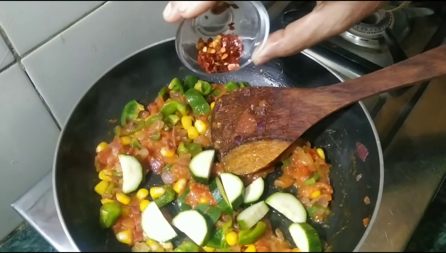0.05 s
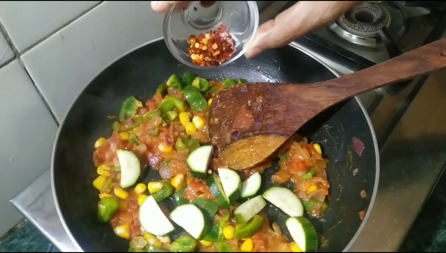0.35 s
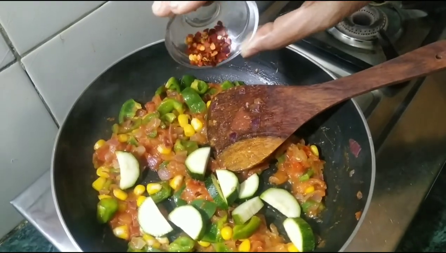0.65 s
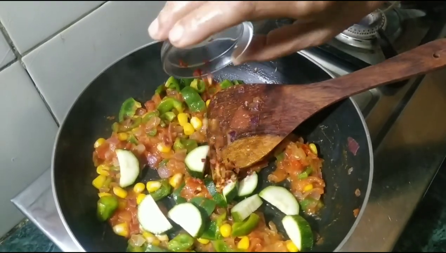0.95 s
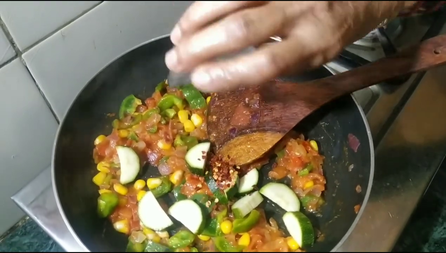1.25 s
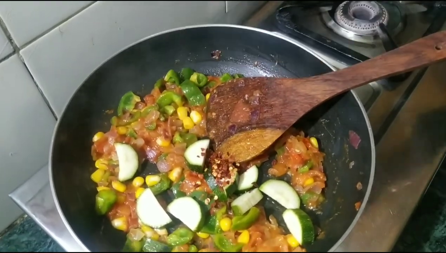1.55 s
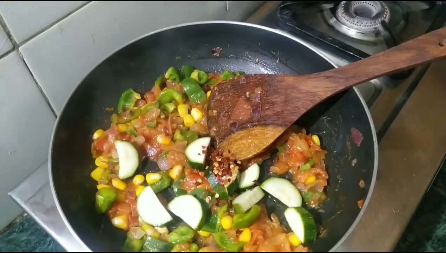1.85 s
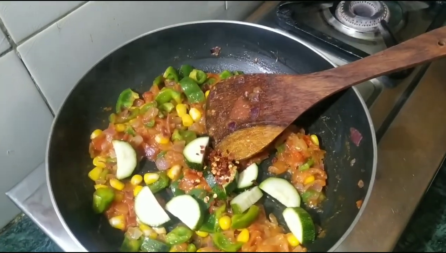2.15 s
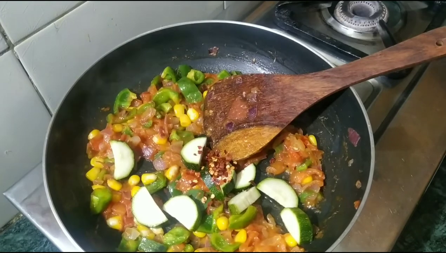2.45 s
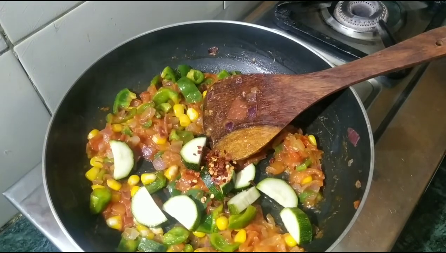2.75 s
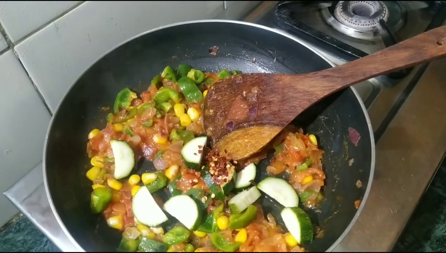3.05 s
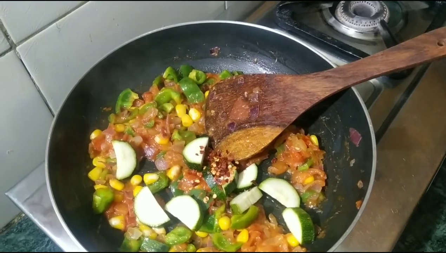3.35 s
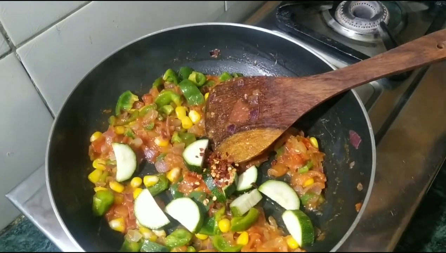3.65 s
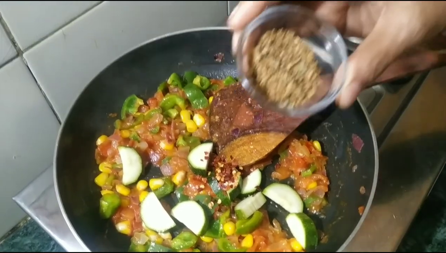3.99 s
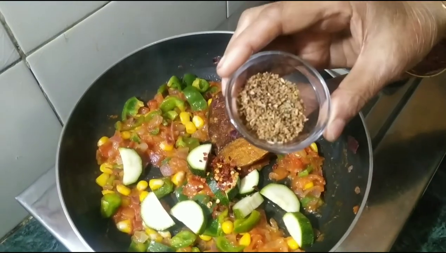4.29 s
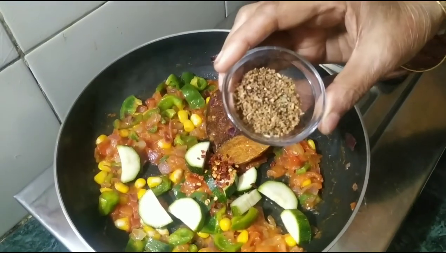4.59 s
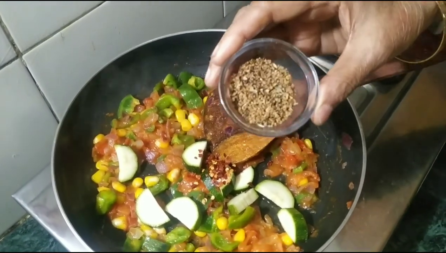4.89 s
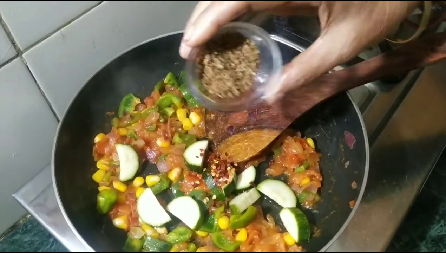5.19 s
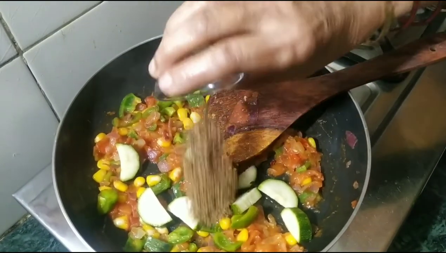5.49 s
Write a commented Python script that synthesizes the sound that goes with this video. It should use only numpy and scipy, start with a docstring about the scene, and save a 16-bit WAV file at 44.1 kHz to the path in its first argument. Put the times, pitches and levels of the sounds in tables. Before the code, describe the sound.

Vegetables sizzle faintly in oil throughout, over the soft flutter of a gas flame, a low motor hum and a thin electric whine. Light ticks of fingers and spices come at about 0.2 and 1.1 seconds. At 1.45 seconds a small glass bowl knocks sharply onto a stone counter, chattering for an instant. From about 1.75 to 2 seconds it rattles against a second bowl in five quick, bright clinks, with a high ring that a hand damps. These knocks and clinks are by far the loudest sounds. A larger dish rings on faintly, and the sizzle swells briefly around 2.2 seconds. Scattered light taps follow, the clearest at about 3.9, 4.3 and 4.8 seconds, with a tiny ping near 5.3 seconds. Everything sounds close, with the short reflections of a tiled kitchen.

```python
"""Glass spice bowls in a tiled kitchen.

Vegetables sizzle faintly as steam bubbles burst in oil, over a gas flame, motor hum and electric whine.
Fingers, spices and utensils tap lightly. A small glass bowl knocks down on a stone counter,
then rattles against a second bowl and rings until the hand damps it."""
import sys
import numpy as np
from scipy import signal
from scipy.fft import rfft, irfft
from scipy.io import wavfile
from scipy.ndimage import uniform_filter1d

SR = 44100
rng = np.random.default_rng(int(sys.argv[2]) if len(sys.argv) > 2 else 0)


def inscribe(sig):
    """Save sig as 16-bit PCM at rate SR to the path in sys.argv[1].

    A 1-D sig is mono; a 2-D sig holds one channel per row.
    Samples are clipped to [-1, 1] before scaling.
    """
    pcm = np.round(np.clip(np.atleast_2d(sig).T, -1, 1) * 32767)
    wavfile.write(sys.argv[1], SR, pcm.astype(np.int16))


N = 243873
TIME = np.arange(N) / SR


def amp(db):
    """Decibels to gain."""
    return 10 ** (np.asarray(db) / 20)


def unit(x):
    """Scale to rms 1."""
    return x / np.sqrt(np.mean(x ** 2) + 1e-20)


def read(points, hz):
    """Interpolate a table over log frequency."""
    f, value = np.transpose(points)
    return np.interp(np.log(hz + 1), np.log(f), value)


def add(mix, start_s, sound):
    """Mix a sound in at start_s."""
    part = mix[max(round(start_s * SR), 0):][:len(sound)]
    part += sound[:len(part)]


def tint(x, colour):
    """Filter by a spectrum table; rms 1."""
    return unit(irfft(rfft(x) * amp(read(colour, np.fft.rfftfreq(N, 1 / SR))), N))


def drift(rate_hz):
    """Slow random wander; rms 1."""
    lowpass = np.exp(-(np.fft.rfftfreq(N, 1 / SR) / rate_hz) ** 2)
    return unit(irfft(rfft(rng.standard_normal(N)) * lowpass, N))


def kitchen(x, build_s):
    """Dense reflections off tiles and steel build up, then die band by band."""
    # room decay: f/Hz, t60/s
    decay = [(150, .2), (800, .3), (2000, .245), (3300, .21), (5500, .18), (14000, .12)]
    echoes = rng.standard_normal(SR) * (rng.random(SR) < .2)
    hz, t, bands = signal.stft(echoes, SR, nperseg=256)
    bands = bands * amp(-60 * t / read(decay, hz)[:, None])
    tail = signal.istft(bands, SR, nperseg=256)[1][:SR]
    tail *= 1 - np.exp(-TIME[:SR] / build_s)
    return signal.fftconvolve(x, tail / np.linalg.norm(tail))[:N]


def sizzle(pops_per_s=2500, spread_db=4, flare_s=2.185, flare_db=6, flare_width_s=.055):
    """Tiny steam bubbles burst in the oil, a few larger; the oil flares up once."""
    # frying strength before the flare: t/s, rms level/dB
    strength = [(0, -55), (.45, -56.5), (.7, -61.5), (1.4, -60.5), (2.2, -59), (2.65, -62.5), (3.2, -58),
                (4.6, -57.5), (5.2, -60)]
    # frying spectrum: f/Hz, relative level/dB
    colour = [(500, -13), (1800, -8.5), (2900, 1), (4600, 4.5), (6000, 0), (8000, -10), (16000, -26)]
    pops = rng.choice([-1, 1], N) * (rng.random(N) < pops_per_s / SR)
    pops = pops * amp(spread_db * np.minimum(rng.exponential(1, N), 4))
    level_db = np.interp(TIME, *np.transpose(strength))
    level_db += flare_db * np.exp(-((TIME - flare_s) / flare_width_s) ** 2)
    return amp(level_db) * tint(pops + kitchen(pops, build_s=.0008), colour)


def flame(level_db=-54, flutter_db=1.7):
    """Soft, fluttering rush of gas flame and room air."""
    # noise spectrum: f/Hz, relative level/dB
    colour = [(30, -44), (80, -28), (125, -26.5), (165, -4.5), (210, -2.5), (300, -1.5), (440, -10),
              (600, -9.5), (900, -14.5), (1300, -11.5), (2500, -10.5), (5000, -14.5), (8400, -26),
              (10300, -17), (12300, -28.5), (15700, -18)]
    return amp(level_db + flutter_db * drift(3.7)) * tint(rng.standard_normal(N), colour)


def motor_hum():
    """A motor and the low resonances it stirs, each wavering in pitch."""
    # hum tones: f/Hz, rms level/dB, rms waver/Hz
    tones = [(100, -88, .5), (167, -74, 4), (197, -66, 2), (221, -69, 6), (281, -69, 6), (296, -66, 3),
             (396, -72, 3), (489, -68, 1.2), (537.5, -63, 1.3), (599, -73, .5)]
    out = np.zeros(N)
    for hz, db, waver_hz in tones:
        turns = np.cumsum(hz + waver_hz * drift(8.35)) / SR + rng.random()
        out += np.sqrt(2) * amp(db) * np.sin(2 * np.pi * turns)
    return out


def whine(base_hz=59.982, harmonic_step=10, buzz_db=-68, fall_db=-2.5):
    """Electric interference: strong harmonics in phase, a fine treble buzz between them."""
    # runs of evenly spaced strong lines: lowest harmonic, line count
    runs = [(20, 4), (81, 11), (162, 11)]
    # strong-line spectrum: f/Hz, rms level/dB
    colour = [(1200, -69.5), (4800, -72), (6100, -68), (7300, -70.5), (8450, -84.5), (9700, -76.5),
              (10900, -78), (12100, -83), (13500, -71.5), (15100, -74), (15700, -78)]
    out = np.zeros(N)
    strong = np.concatenate([lowest + harmonic_step * np.arange(count) for lowest, count in runs])
    for hz in base_hz * strong:
        out += np.sqrt(2) * amp(read(colour, hz)) * np.cos(2 * np.pi * hz * TIME)
    weak = np.setdiff1d(np.arange(148, 262), strong)
    weak_hz = base_hz * weak
    harmonics_away = abs(weak[:, None] - strong).min(axis=1)
    weak_db = read(colour, weak_hz) + fall_db * harmonics_away
    buzz = sum(amp(db) * np.cos(2 * np.pi * (hz * TIME + rng.random()))
               for hz, db in zip(weak_hz, weak_db))
    return out + amp(buzz_db) * unit(buzz)


def tap(peak_db, hz, width_hz, rise_s=.00037):
    """A small blow through one resonance: wide ones tick, narrow ones ping."""
    t = TIME[:SR // 4]
    envelope = np.exp(-np.pi * width_hz * t) * (1 - np.exp(-t / rise_s))
    sound = np.diff(envelope * np.sin(2 * np.pi * hz * t))  # small things radiate little bass
    return amp(peak_db) * sound / abs(sound).max()


def taps(room_db=-4):
    """Light taps of fingers, spices and utensils, and two thin pings."""
    # taps: t/s, level/dB, main resonance f/Hz, width/Hz
    blows = [(.198, -40, 4340, 800), (1.138, -38, 2600, 1800), (2.461, -42, 1290, 500),
             (3.32, -40, 1700, 900), (3.88, -33, 4230, 700), (4.328, -29, 2940, 222),
             (4.801, -33.5, 3600, 1200), (5.31, -50, 5010, 40)]
    # tap resonances: ratio to main f and width, relative level/dB
    tap_modes = [(.51, -14), (1, 0.5), (1.67, -12)]
    # pings: t/s, level/dB
    pings = [(.722, -52.5), (2.8955, -45)]
    # ping resonances: f/Hz, relative level/dB, width/Hz
    ping_modes = [(9400, -2, 50), (12500, -9, 60), (14600, 0, 600)]
    out = np.zeros(N)
    for s, db, hz, width_hz in blows:
        for ratio, mode_db in tap_modes:
            add(out, s, tap(db + mode_db, hz * ratio, width_hz * ratio))
    for s, db in pings:
        for hz, mode_db, width_hz in ping_modes:
            add(out, s, tap(db + mode_db, hz, width_hz))
    return out + amp(room_db) * kitchen(out, build_s=.001)


def knock(colour, ripple_db, smear, size=2048):
    """A click of peak 1 lingering in its resonances; each contact point stresses them differently."""
    hz = abs(np.fft.fftfreq(size, 1 / SR))
    ripple = np.interp(hz, np.linspace(0, SR / 2, num=80), rng.standard_normal(80))
    log_gain = np.log(amp(read(colour, hz) + ripple_db * ripple))
    phase = -(1 + smear) * signal.hilbert(log_gain).imag  # minimum phase, stretched
    impulse = np.fft.ifft(np.exp(log_gain + 1j * phase)).real
    click = np.roll(impulse, 8)[:size // 2]
    return click / abs(click).max()


def mode(hz, db, t60_s):
    """One second of a decaying sine."""
    t = TIME[:SR]
    return amp(db - 60 * t / t60_s) * np.sin(2 * np.pi * hz * t)


def landing(knock_db=2, ring_db=-30, room_db=-5):
    """The bowl chatters to rest on stone; the first knock sets bowl and counter ringing."""
    # contacts: t/s, level/dB re knock_db
    bounces = [(1.4508, -2.5), (1.4567, -5), (1.4613, -10), (1.4666, -10.5)]
    # glass-on-stone spectrum: f/Hz, relative level/dB
    colour = [(40, -40), (170, -35), (500, -21), (750, -13.5), (1400, -8), (2300, 7), (3000, 3), (3700, -1),
              (4300, -1.5), (4900, 5), (5700, -14.5), (7000, -32), (9000, -54), (16000, -37)]
    # joint modes of bowl and counter: f/Hz, level/dB re ring_db, t60/s
    modes = [(830, -17, .25), (1220, -11, .25), (1409, -4, .25), (1919, -7, .24), (2209, -5, .18),
             (2265, -6, .22), (2601, -5, .18), (2772, -6, .17), (2923, -4, .14), (3618, -7, .17),
             (4843, -1, .22), (11720, -9, .08), (14700, -11, .09)]
    knocks, ring = np.zeros((2, N))
    contact = amp(knock_db) * knock(colour, ripple_db=1.5, smear=.85)
    for s, db in bounces:
        add(knocks, s, amp(db) * contact)
    for hz, db, t60_s in modes:
        add(ring, bounces[0][0], rng.choice([-1, 1]) * mode(hz, db + ring_db, t60_s))
    return knocks + ring + amp(room_db) * kitchen(knocks, build_s=.0024)


def contacts(gap_stretch=1.58, rebound_db=-3, graze_lead_s=.0025, graze_db=-16, graze_ring_db=-14):
    """Each clash is a graze of the rims, a blow and two rebounds. Rows: t/s, knock/dB, ring/dB."""
    # bowl on bowl: t/s, knock level/dB, ring level/dB, first gap/s, ring change per rebound/dB
    clashes = [(1.7631, -4.5, -14, .0029, -4), (1.8223, -3.5, -14, .0055, 1.5),
               (1.8728, -3.5, -14.5, .0033, 1), (1.9137, -4.5, -9, 0.005, -4),
               (1.9376, -9.5, -13, .0138, -3.5)]
    k, rows = np.arange(3), []
    for s, knock_db, ring_db, gap_s, step_db in clashes:
        gaps_s = gap_s * gap_stretch ** k  # longer as the bowls part
        rows.append((s - graze_lead_s, knock_db + graze_db, ring_db + graze_ring_db))
        rows += zip(s + np.cumsum(gaps_s) - gaps_s, knock_db + rebound_db * k ** 2, ring_db + step_db * k)
    return rows


def rattle(bowl_hz=4916, bowl_t60_s=.2, grip_s=1.976, grip_t60_s=.095, shove_rad=.89,
           linger_db=-13, linger_t60_s=.22, room_db=-5, ring_room_db=-21):
    """Every contact knocks and resets the swing and phase of the bowl's modes, until fingers damp them."""
    # glass-on-glass spectrum: f/Hz, relative level/dB
    colour = [(40, -52), (170, -35), (600, -24), (1000, -18.5), (1450, -7), (2000, -3.5), (2600, -3),
              (3150, 4), (4200, -10), (5100, -3), (5900, -14), (7000, -29.5), (9000, -43), (16000, -41)]
    # other bowl modes: f/Hz, level/dB re main note, t60/s
    modes = [(3072, -24, .15), (3369, -20, .28), (8810, -44, .2), (10000, -50, .15), (11730, -35, .08),
             (14690, -37, .12)]
    knocks, ring = np.zeros((2, N))
    clinks = contacts()
    for s, db, _ in clinks:
        add(knocks, s, amp(db) * knock(colour, ripple_db=3.5, smear=.4))
    starts_s, _, ring_db = np.transpose(sorted(clinks))
    latest = np.maximum(np.searchsorted(starts_s, TIME, side="right") - 1, 0)
    age_s = TIME - starts_s[latest]
    grip_db = -60 * np.maximum(TIME - grip_s, 0) / grip_t60_s
    pole = amp(-60 / (linger_t60_s * SR))  # the tiled corner holds the note briefly
    for hz, db, t60_s in [(bowl_hz, 0, bowl_t60_s)] + modes:
        swing = amp(db + ring_db[latest] + grip_db - 60 * abs(age_s) / t60_s) * (age_s >= 0)
        linger = amp(linger_db) * signal.lfilter([1 - pole], [1, -pole], swing)
        envelope = uniform_filter1d(np.hypot(swing, linger), size=48)
        shoves_rad = shove_rad * rng.standard_normal(len(starts_s))
        phase_rad = uniform_filter1d(shoves_rad[latest], size=64)
        ring += envelope * np.sin(2 * np.pi * hz * TIME + phase_rad)
    return knocks + ring + kitchen(amp(room_db) * knocks + amp(ring_room_db) * ring, build_s=.0017)


def dish(start_s=1.9133):
    """A larger dish rings along after the hardest clink."""
    out = np.zeros(N)
    add(out, start_s, mode(hz=1614, db=-47.5, t60_s=1.33))
    return out


def scene():
    """All sources, mono."""
    return (landing() + rattle() + dish() + taps() + sizzle() + flame() + motor_hum() + whine())[None]


def record(dry, low_cut_hz=90, high_cut_hz=15850):
    """A small microphone with little bass, then a steep band limit."""
    thin = signal.sosfilt(signal.butter(1, low_cut_hz, "highpass", fs=SR, output="sos"), dry)
    lowpass = signal.firwin(511, high_cut_hz, window=("kaiser", 9), fs=SR)
    return signal.oaconvolve(thin, lowpass[None], "same")


dry = scene()
out = record(dry)
inscribe(out)
```